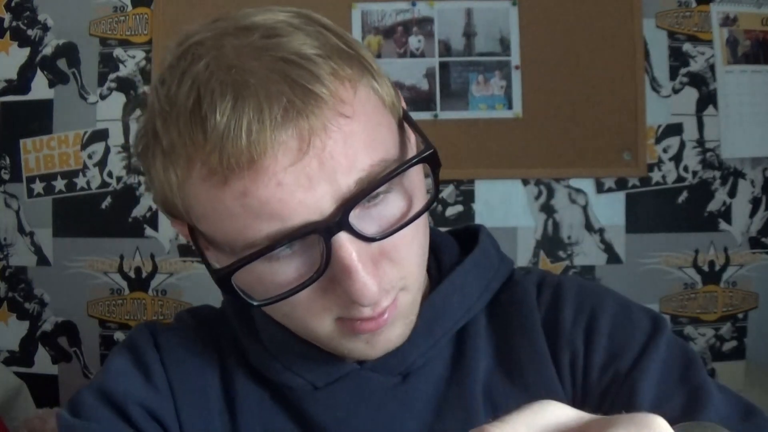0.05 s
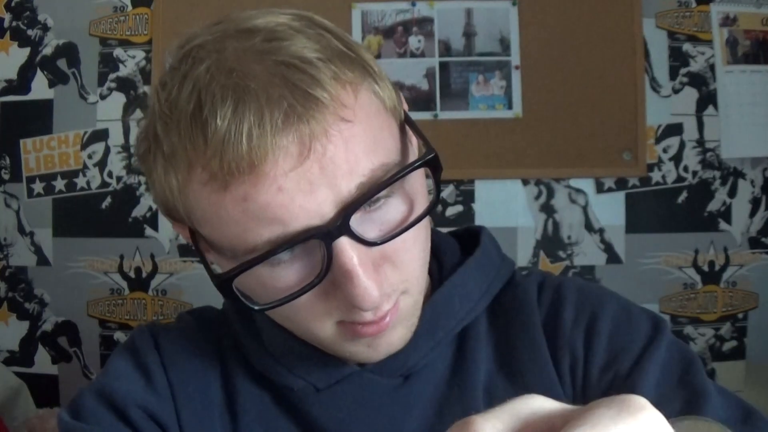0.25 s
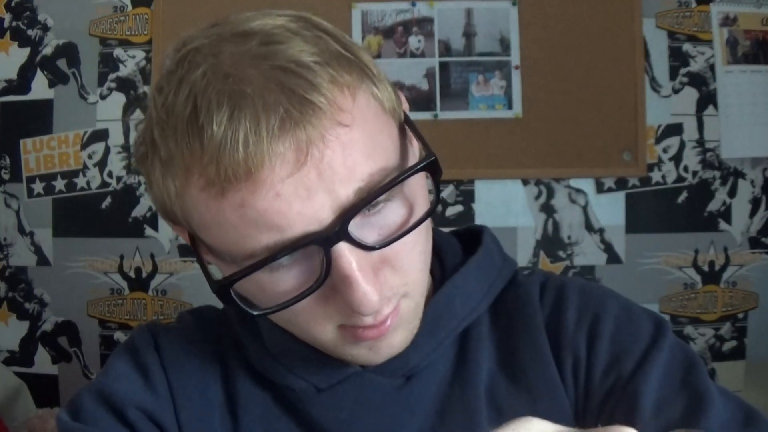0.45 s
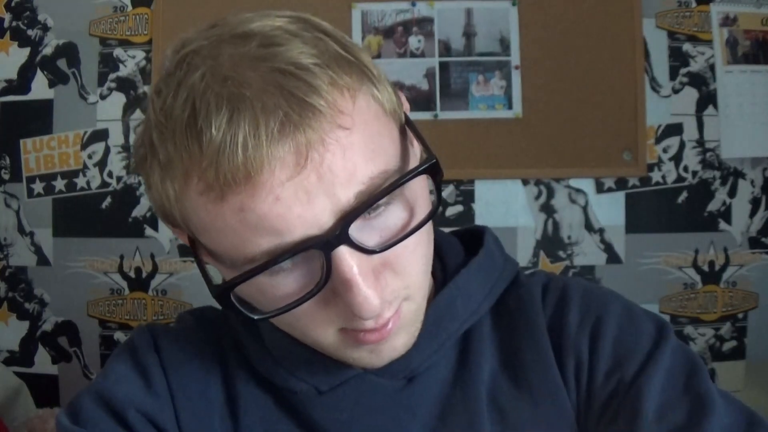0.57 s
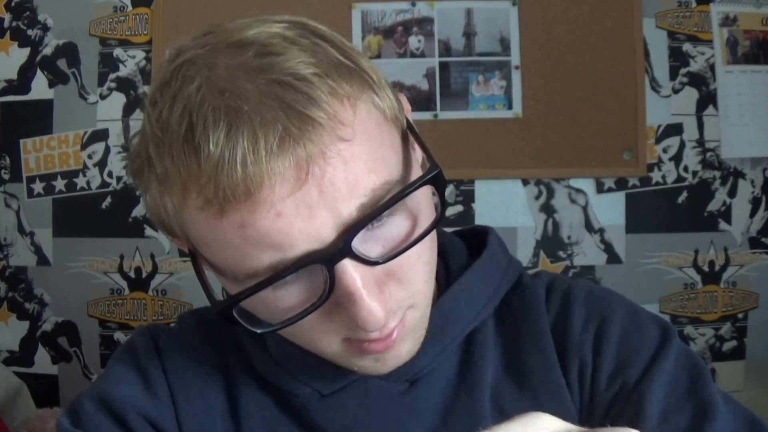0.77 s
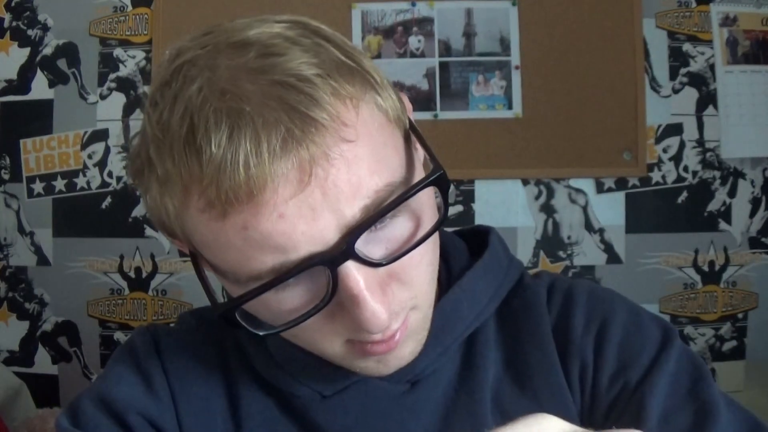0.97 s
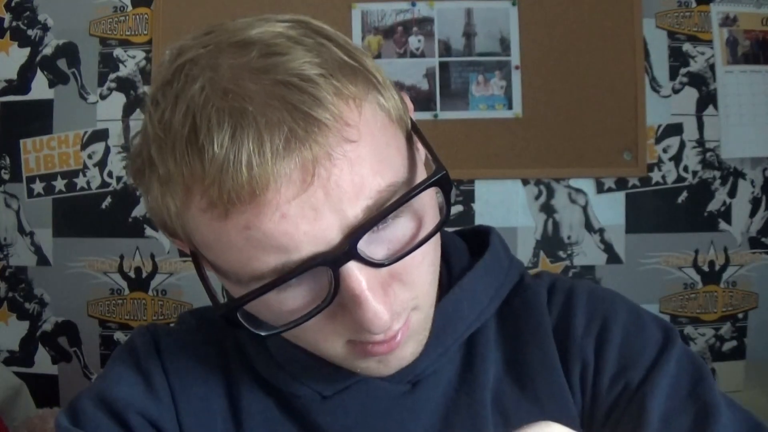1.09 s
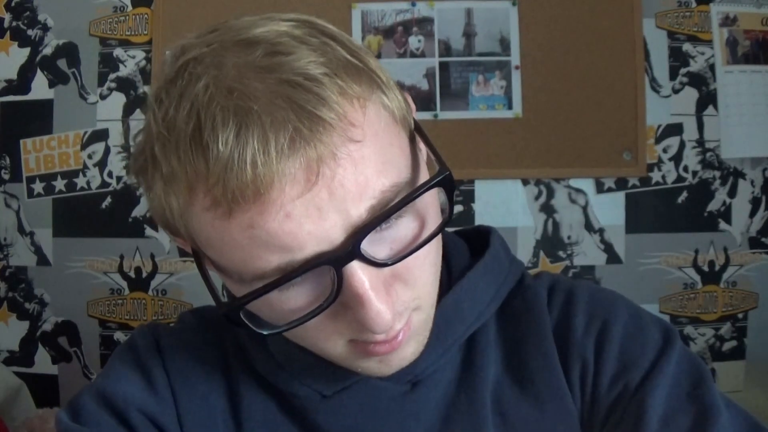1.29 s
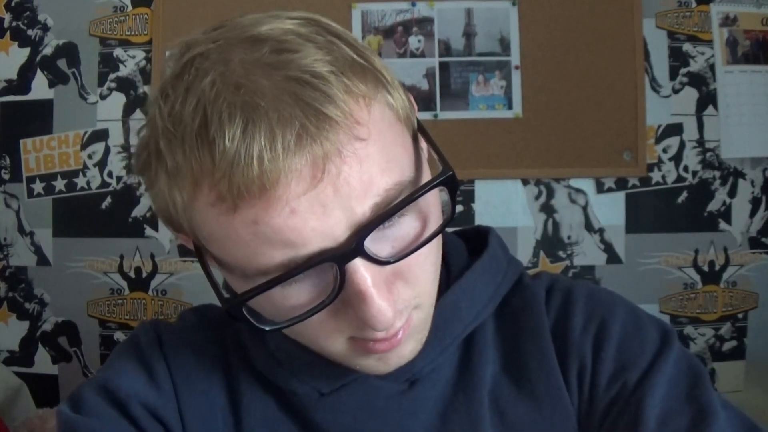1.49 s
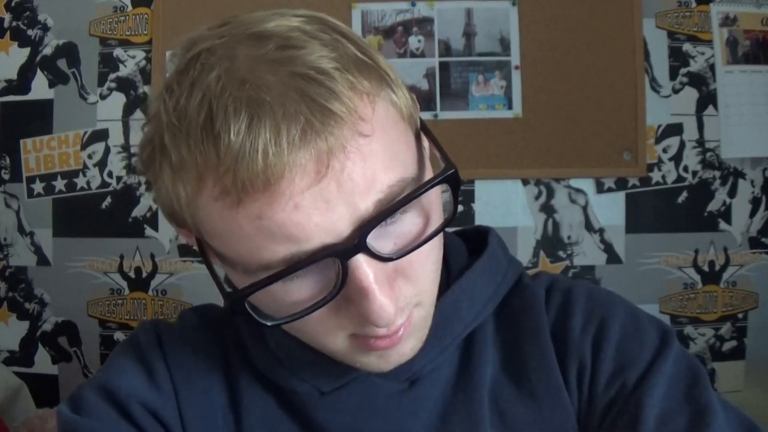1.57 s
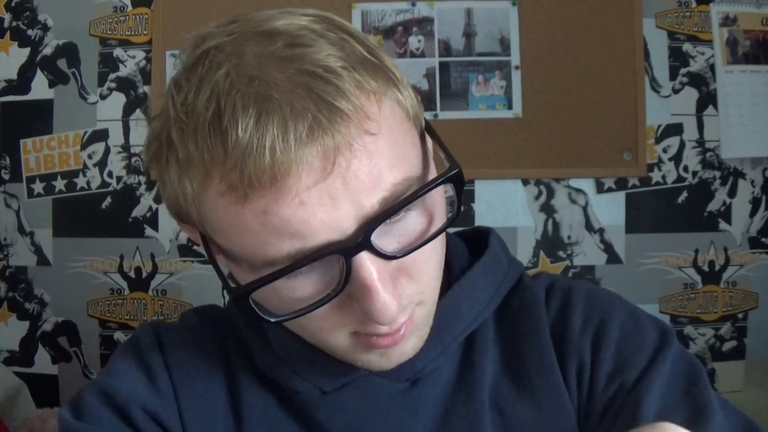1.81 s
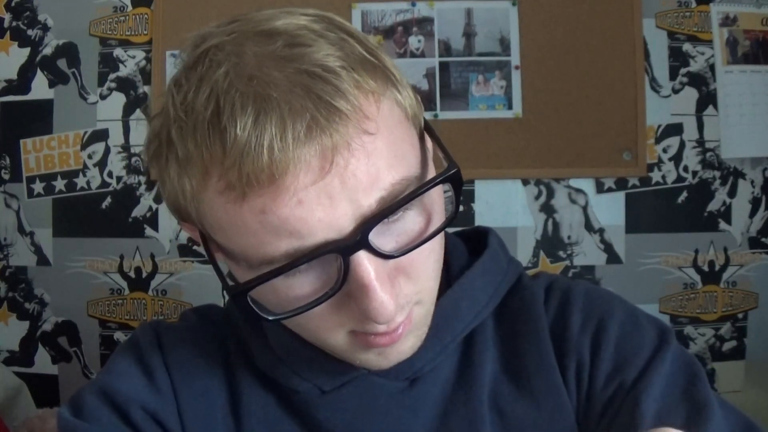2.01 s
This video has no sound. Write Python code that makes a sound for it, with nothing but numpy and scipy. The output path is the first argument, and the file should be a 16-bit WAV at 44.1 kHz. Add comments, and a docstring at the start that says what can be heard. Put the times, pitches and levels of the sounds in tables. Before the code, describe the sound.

Steel handcuffs click lightly, close by, from 0.1 seconds. At about 0.45 seconds the loudest click starts a short ratchet rattle, over by 0.6. A single click rings thinly at 0.9, a quick cluster comes around 1.2, and scattered clicks follow from 1.6 to 2 seconds. Most are bright and quickly damped. A faint fan hum, hiss and tiny rapid electrical pips continue throughout in the quiet room.

```python
"""Steel handcuffs click as they are handled close by in a quiet room.
Steel strikes steel, and the hands stop most of the ringing; a part left free rings a little longer.
Once, the ratchet runs through in a short rattle as its catch drops over the teeth.
A fan hums behind, and a faint electrical pip repeats in the microphone hiss."""
import sys
import numpy as np
from scipy import signal
from scipy.fft import rfft, irfft
from scipy.io import wavfile
from scipy.ndimage import uniform_filter1d

SR = 44100
rng = np.random.default_rng(int(sys.argv[2]) if len(sys.argv) > 2 else 0)


def log_audio(samples):
    """Write samples as a 16-bit WAV file to the path given in sys.argv[1]."""
    # one column per channel
    frames = np.atleast_2d(samples).T
    # limit to full scale, then quantise
    limited = np.clip(frames, -1, 1)
    pcm = np.round(limited * 32767).astype(np.int16)
    wavfile.write(sys.argv[1], SR, pcm)


N = 90404

# Four pitch regions that shape a click. In order, in Hz: knock, middle, bright core, treble.
TONE_BANDS_HZ = (2300, 4400, 7900, 13300)
TICK_RANGE_HZ = (6000, 10000)  # where a small tick rings most strongly


def cuff_clicks(ring_db, crack_db):
    """Steel strikes steel in single clicks, each with a tone set by where the parts meet."""
    # Each row: start in seconds, relative level in dB, contact time in seconds, strongest ring in Hz,
    # then the boost of knock, middle and treble in dB.
    strikes = [(0.108, -38, 0.0021, 7700, 6, 11, 0), (0.114, -41, 0.0029, 7700, 16, 11, -4),
               (0.1835, -43.5, 0.00213, 4740, -1, 9, 2.5), (0.192, -41, 0.0018, 5700, 3, 5, 4),
               (0.2154, -30.5, 0.00038, 5860, -18, -1, -3), (0.236, -39, 0.00037, 9300, 4, -2, -2),
               (0.2701, -29, 0.00041, 8900, -1.5, -1.5, -11), (0.2755, -26.5, 0.00093, 10670, 5.5, 3, 4),
               (0.3978, -47, 0.00027, 6150, 1, 3, -3), (0.45, -21.5, 0.0019, 7100, -14, 1, -5),
               (0.4554, -25, 0.00077, 7900, -6, -4, -7), (0.4979, -25, 0.0018, 8900, -7, -8, -7),
               (0.5497, -35, 0.0019, 8300, 10, 8, -2), (0.5967, -40, 0.0025, 6530, -3, -8, -8),
               (0.681, -45.5, 0.00067, 8440, 4, 3, -9), (0.8877, -31.5, 0.00052, 6640, -0.5, -10.5, -4),
               (1.154, -42, 0.0025, 6650, -2, 1, -12), (1.1697, -31.5, 0.00071, 6340, -14, -3, 3),
               (1.1828, -42, 0.00061, 6800, 1, 5, 0.5), (1.1883, -37.5, 0.00115, 6050, 3, 5, -1),
               (1.196, -39, 0.002, 5400, 18, -2, -8), (1.2064, -30, 0.0016, 5930, 9, 4.5, 3.5),
               (1.2356, -37.5, 0.0028, 4300, 7, -1, -3), (1.2412, -30.5, 0.00107, 8460, -2, 3, -10),
               (1.2446, -30, 0.0018, 8400, 0, 4.5, 3), (1.247, -28, 0.0016, 5500, 8, 5.5, 3.5),
               (1.439, -49, 0.00041, 6920, 3, -8, -13), (1.63, -41, 0.00072, 7750, 9.5, 7, -4),
               (1.6364, -30.5, 0.00074, 7160, -13, -1.5, -8), (1.7969, -30, 0.00064, 8090, -4, 0, -0.5),
               (1.8682, -38.5, 0.00053, 8440, -14, -3.5, -10), (1.8967, -44, 0.00029, 9300, 17, 8, -8),
               (1.9146, -39.5, 0.00056, 8930, 16, 0, -10), (1.938, -44.5, .0005, 8450, 6, 4, -2),
               (1.962, -45, 0.00093, 7700, -4.5, 0, -2)]
    out = np.zeros(N)
    for start, db, contact_s, ring_hz, knock, middle, treble in strikes:
        tone = list(zip(TONE_BANDS_HZ, (knock, middle, 0, treble)))
        click = steel_click(contact_s, ring_hz, ring_db, crack_db)
        add(out, start, amp(db) * unit(shape_tone(click, tone)))
    return out


def steel_click(contact_s, ring_hz, ring_db=-5, crack_db=3, size=1024):
    """A strike briefly rings the held steel. The defaults give a small tick that is mostly crack."""
    # The notes of the held cuffs. Each row: pitch in Hz, relative level in dB.
    steel_notes = [(1700, -17.5), (2850, -8.5), (3950, -14.5), (4600, -3.5), (5500, -3.5), (5900, -2.5),
                   (6800, -1), (7850, 3.5), (8850, 3.5), (9400, 5), (10400, -0.5), (12300, -3.5),
                   (13400, -4.5), (14300, -6)]
    # The crack of the contact itself. Each row: frequency in Hz, relative level in dB.
    crack_tone = [(200, -47), (1000, -31), (2200, -17.5), (4500, 2), (8500, 2), (11000, -4), (14000, -14.5),
                  (16000, -8.5)]
    # Small parts give off little bass. Each row: frequency in Hz, gain in dB.
    bass_cut = [(90, -28.5), (800, -9)]
    t = np.arange(size) / SR
    contact = np.sqrt(t / contact_s) * np.exp(-(t / contact_s) ** 2)
    force = amp(-1.5) * chatter(contact)
    force[0] += 1  # the strike itself
    notes = np.zeros(size)
    for hz, db in steel_notes:
        detuned_hz = hz * (1 + 0.0084 * rng.standard_normal())
        notes += amp(db) * np.sin(2 * np.pi * (detuned_hz * t + rng.random()))
    body = unit(signal.fftconvolve(force, notes * fade(t, fade_s=0.0089))[:size])
    crack = unit(shape_tone(chatter(contact), crack_tone))
    hit = body + amp(crack_db) * crack
    strongest_note = np.cos(2 * np.pi * ring_hz * t) * fade(t, fade_s=0.0055)
    ring = signal.fftconvolve(hit, strongest_note)[:size]
    return unit(shape_tone(unit(hit) + amp(ring_db) * unit(ring), bass_cut))


def chatter(contact):
    """Many tiny touches within one strike, evened out so they have no pitch of their own."""
    touches = rng.standard_normal(len(contact)) * contact
    for _ in range(4):
        flat_spectrum = np.exp(1j * np.angle(rfft(touches)))
        touches = irfft(flat_spectrum, len(touches)) * np.sqrt(contact)
    return unit(touches)


def ratchet_teeth(size=2048):
    """The catch drops over each tooth with a sharp click that rings the cuff's swinging arm."""
    # Teeth passing the catch. Each row: start in seconds, relative level in dB.
    teeth = [(0.4594, -35), (.4641, -35), (0.4734, -42.5), (0.4795, -32), (0.488, -32), (0.4904, -32),
             (0.5038, -36), (0.5075, -38), (.517, -36), (0.5204, -42), (0.5253, -32), (0.5316, -33),
             (0.5405, -37.5)]
    # The tone of a tooth's click. Each row: frequency in Hz, gain in dB.
    tooth_tone = [(2300, -5), (8100, 3), (14000, 5.5)]
    # The arm's notes. Each row: pitch in Hz, relative level in dB, fade time in seconds.
    arm_notes = [(3030, -17, 0.018), (4450, -24, .02)]
    out, t = np.zeros(N), np.arange(size) / SR
    arm = sum(amp(db) * unit(np.sin(2 * np.pi * hz * t) * fade(t, fade_s))
              for hz, db, fade_s in arm_notes)
    for start, db in teeth:
        tick = steel_click(contact_s=0.00083, ring_hz=rng.uniform(*TICK_RANGE_HZ), size=size)
        add(out, start, amp(db) * (unit(shape_tone(tick, tooth_tone)) + arm))
    return out


def loose_parts():
    """The parts rattle finely as the ratchet runs, and when they shift in the fingers."""
    # The ratchet's rattle. Each row: time in seconds, relative level in dB.
    ratchet_levels = [(.452, -44), (.47, -44), (.5, -41.5), (.53, -45), (.548, -51.5), (.575, -55),
                      (.65, -65)]
    # Light shifts. Each row: start in seconds, end in seconds, relative level in dB.
    shifts = [(0.077, 0.144, -56.5), (1.145, 1.157, -49), (1.879, 1.889, -46.5)]
    out = rattle(ratchet_levels, ticks_per_s=640, contact_s=0.00094, treble_db=3)
    for start, end, db in shifts:
        out += rattle([(start, db), (end, db)], ticks_per_s=280, contact_s=0.0019, treble_db=-3)
    return out


def rattle(levels, ticks_per_s, contact_s, treble_db, spread_db=1.5):
    """Small steel ticks come at a roughly even pace and follow a loudness curve."""
    out = np.zeros(N)
    times, dbs = np.transpose(levels)
    tone = list(zip(TONE_BANDS_HZ[2:], (0, treble_db)))
    for start in np.arange(times[0], times[-1], 1 / ticks_per_s):
        db = np.interp(start, times, dbs) + spread_db * rng.standard_normal()
        tick = steel_click(contact_s, rng.uniform(*TICK_RANGE_HZ))
        add(out, start + rng.random() / ticks_per_s, amp(db) * shape_tone(tick, tone))
    return out


def free_ringing(rise_s=0.001):
    """A part that is left free rings on after its click with a thin, dying tone."""
    # Each row: start in seconds, pitch in Hz, level in dB, fade time in seconds.
    pings = [(0.277, 10380, -42, .06), (0.4506, 4410, -25.5, 0.014), (.597, 6380, -53, 0.12),
             (0.888, 6830, -39.5, 0.068), (0.889, 10000, -48, 0.13), (1.247, 5440, -45, 0.12),
             (1.795, 5830, -43, 0.03), (1.797, 2740, -37.5, 0.014)]
    out, t = np.zeros(N), np.arange(SR // 4) / SR
    rise = np.minimum(t / rise_s, 1)
    for start, hz, db, fade_s in pings:
        add(out, start, amp(db) * rise * fade(t, fade_s) * np.sin(2 * np.pi * hz * t))
    return out


def room(direct, to_walls, likeness=0.81):
    """Sound reaches two microphones directly, as one near echo, and as a fading wash off the walls."""
    # How long the wash lasts. Each row: frequency in Hz, fade time in seconds.
    wash_times = [(1000, 0.58), (5000, 0.12), (10000, 0), (15000, 0.0059)]
    # The tone of the wash. Each row: frequency in Hz, gain in dB.
    wash_tone = [(1000, -9), (4000, -11.5), (8600, -9.5), (10300, -1.5), (11500, 1.5), (14500, -13.5)]
    # The right microphone hears the cuffs slightly before the left.
    # Each row: frequency in Hz, left phase minus right phase in radians.
    phase_gap = [(5000, -0.22), (10500, -0.58)]
    hz, t, spectrum = signal.stft(rng.standard_normal((2, SR // 2)), SR, nperseg=256)
    faint_tail = amp(-3) * fade(t, fade_s=0.3)
    spectrum = spectrum * (fade(t, look_up(wash_times, hz)[:, None]) + faint_tail)
    left, other = signal.istft(spectrum, SR, nperseg=256)[1]
    out = np.array([direct, direct])
    for side, noise in zip(out, stereo_pair(left, other, likeness)):
        wash = signal.fftconvolve(to_walls, shape_tone(unit(noise), wash_tone))
        add(side, start_s=0.0096, sound=amp(-27.5) * direct)
        add(side, start_s=0.003, sound=wash)
    phase = np.outer([.5, -.5], look_up(phase_gap, np.fft.rfftfreq(N, 1 / SR)))
    return irfft(rfft(out) * np.exp(1j * phase), N)


def fan(shaft_hz=45.8, waver_depth=0.00076):
    """A fan hums at multiples of its turning speed, which wavers slightly."""
    # Each row: multiple of the turning speed, level in dB.
    hum_notes = [(1, -80), (3, -62.5), (4, -65), (10, -74.5), (11, -75), (12, -78), (16, -71.5), (19, -77),
                 (46, -79)]
    t = np.arange(N) / SR
    waver = sum(np.sin(2 * np.pi * (hz * t + rng.random())) for hz in np.geomspace(.4, 6, 10))
    turns = np.cumsum(shaft_hz * (1 + waver_depth * waver / np.sqrt(5))) / SR
    return sum(np.sqrt(2) * amp(db) * np.cos(2 * np.pi * (multiple * turns + rng.random()))
               for multiple, db in hum_notes)


def air_and_hiss(level_db=-59, patchy_db=1, size=1024):
    """Room air and microphone hiss make a steady, faintly patchy noise."""
    # The tone of the noise. Each row: frequency in Hz, relative level in dB.
    hiss_tone = [(20, -23), (45, -15), (130, 1), (600, 0), (730, 2.5), (900, -0.5), (1500, -3),
                 (3000, -4.5), (4500, -9.5), (10000, -10.5), (15500, -18.5)]
    # How alike left and right are. Each row: frequency in Hz, likeness from 0 to 1.
    likeness = [(100, 0.96), (300, 0.588), (1400, 0.26), (3000, 0.44), (7000, 0.78), (15000, 1)]
    hz = np.fft.rfftfreq(size, 1 / SR)
    noise = rng.standard_normal((5, 4 * N // size + 5, len(hz)))
    patches = uniform_filter1d(noise[4], size=10, axis=0)  # smooth over time
    patches = uniform_filter1d(patches, size=10, axis=1)  # and over frequency
    spectrum = stereo_pair(noise[0] + 1j * noise[1], noise[2] + 1j * noise[3], look_up(likeness, hz))
    spectrum *= amp(look_up(hiss_tone, hz) + patchy_db * patches / patches.std())
    hiss = signal.istft(spectrum.swapaxes(1, 2), nperseg=size, noverlap=size * 3 // 4)[1][:, :N]
    return amp(level_db) * hiss / hiss.std()


def electrical_pips(every_s=0.04, pitch_hz=3415, glide_hz_per_s=30000, width_s=0.0027):
    """Electrical interference makes a tiny rising pip at a steady pace."""
    out, t = np.zeros(N), np.arange(-every_s / 2, every_s / 2, 1 / SR)
    swell = np.exp(-(t / width_s) ** 2)
    for start in np.arange(every_s / 2, N / SR, every_s):
        tone = np.sin(2 * np.pi * (pitch_hz * t + glide_hz_per_s * t ** 2 / 2 + rng.random()))
        db = -57 - 1.5 * rng.standard_normal()
        add(out, start, amp(db) * tone * swell)
    return out


def amp(db):
    """Turns decibels into a number to multiply by."""
    return 10 ** (np.asarray(db) / 20)


def fade(t, fade_s):
    """Dies away by 60 dB over the fade time."""
    return amp(-60 * t / fade_s)


def unit(sound):
    """Scales a sound so its energy is 1."""
    return sound / np.sqrt(np.sum(sound ** 2) + 1e-20)


def look_up(points, hz):
    """Reads between a table's rows, giving each octave about equal space."""
    row_hz, values = np.transpose(points)
    return np.interp(np.log(hz + 1), np.log(row_hz + 1), values)


def add(mix, start_s, sound):
    """Lays a sound into the mix at its start time."""
    part = mix[max(round(start_s * SR), 0):][:len(sound)]
    part += sound[:len(part)]


def shape_tone(sound, points):
    """Turns frequencies up or down by rows of (Hz, dB), without smearing the sound earlier in time."""
    size = 2 * len(sound)
    log_gain = np.log(amp(look_up(points, abs(np.fft.fftfreq(size, 1 / SR)))))
    response = np.exp(np.conj(signal.hilbert(log_gain)))
    return np.fft.ifft(np.fft.fft(sound, size) * response).real[:len(sound)]


def stereo_pair(left, other, likeness):
    """Makes left and right from two noises; at likeness 1 both sides are the same."""
    return np.array([left, likeness * left + np.sqrt(1 - likeness ** 2) * other])


def scene():
    """The handcuffs in the room, over the fan and the hiss."""
    background = air_and_hiss() + fan() + electrical_pips()
    direct = cuff_clicks(ring_db=-5, crack_db=-4)
    to_walls = cuff_clicks(ring_db=-8, crack_db=0.5)  # over all directions, a click has less pitch
    ticks = ratchet_teeth() + loose_parts()
    click_gain = np.sqrt(0.002 * SR)  # energy 1 becomes full level for 2 ms
    return click_gain * room(direct + ticks, to_walls + ticks) + free_ringing() + background


def record(dry, top_hz=15900):
    """Two slightly unequal microphones pick up the sound, and the highest treble is cut."""
    # Each row: frequency in Hz, left level minus right level in dB.
    imbalance = [(300, -0.059), (1200, -1.4), (4400, -0.25), (8500, -1.4), (13000, 0.6)]
    side_db = np.outer([.5, -.5], look_up(imbalance, np.fft.rfftfreq(N, 1 / SR)))
    picked_up = irfft(rfft(dry) * amp(side_db), N)
    treble_cut = signal.firwin(511, top_hz, window=("kaiser", 9), fs=SR)
    return signal.oaconvolve(picked_up, treble_cut[None], "same")


dry = scene()
out = record(dry)
log_audio(out)
```